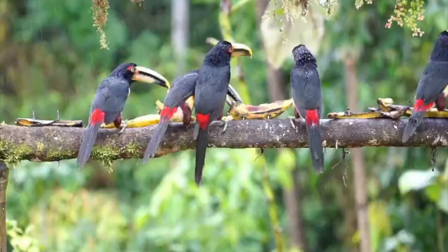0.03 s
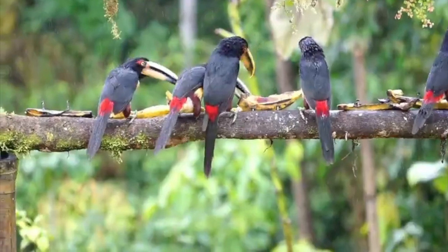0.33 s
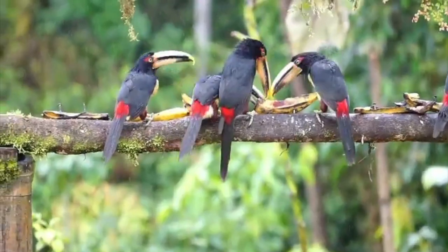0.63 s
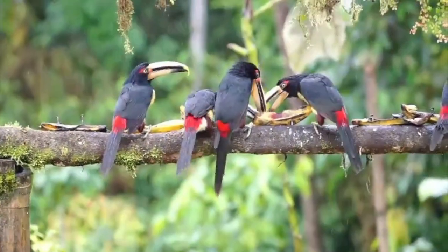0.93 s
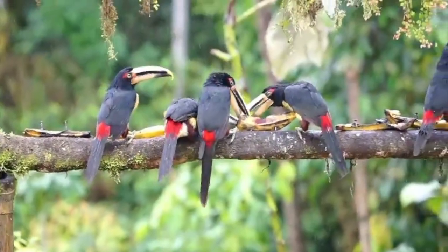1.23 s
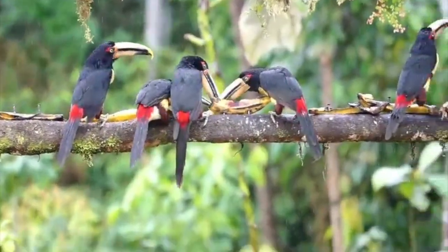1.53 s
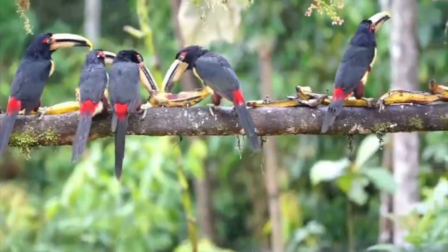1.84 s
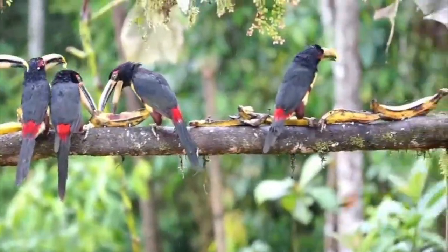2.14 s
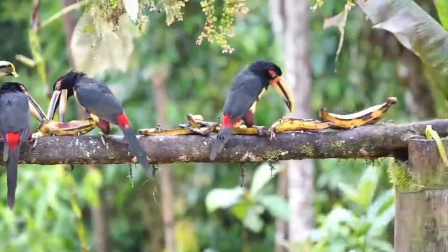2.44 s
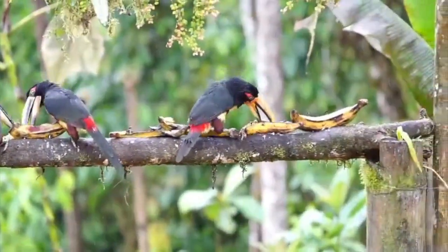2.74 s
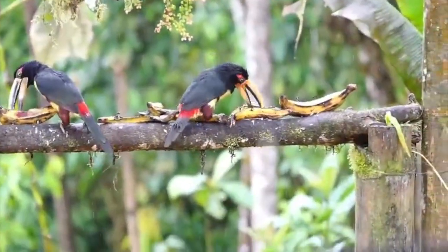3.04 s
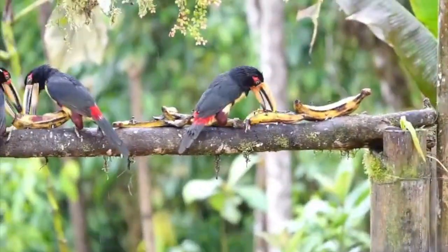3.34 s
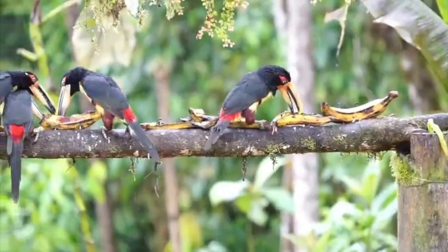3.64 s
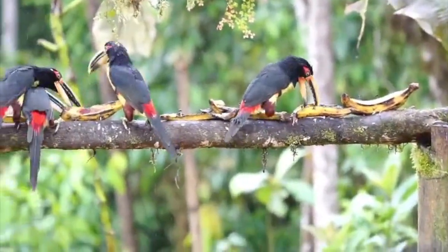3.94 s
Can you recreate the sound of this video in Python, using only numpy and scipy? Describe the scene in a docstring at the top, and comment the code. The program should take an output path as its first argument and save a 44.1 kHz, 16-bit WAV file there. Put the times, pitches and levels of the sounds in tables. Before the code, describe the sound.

Steady light rain and running water fill a forest garden, with soft hollow hoots early and more plops later. Birds on a perch near the microphone flutter once, tick and rustle, and faint high chirps echo slightly.

```python
"""Light rain in a forest garden.

Two microphones stand beside a feeding perch. Drops patter on leaves and ground over a wash of running
water, and something hollow, perhaps a drain, gurgles, hoots and plops. Close by, birds on the perch rustle,
tick and briefly beat their wings; falling chips and thin high notes echo among the trees."""
import sys
import numpy as np
from scipy import signal
from scipy.fft import rfft, irfft
from scipy.io import wavfile
from scipy.ndimage import uniform_filter1d

SR = 44100
rng = np.random.default_rng(int(sys.argv[2]) if len(sys.argv) > 2 else 0)


def put_to_file(sound):
    """Save the sound as 16-bit audio at rate SR, in the file named by the first command-line argument."""
    columns = np.atleast_2d(sound).T  # one column per channel
    safe = np.clip(columns, -1, 1)
    whole_steps = np.round(safe * 32767)
    wavfile.write(sys.argv[1], SR, whole_steps.astype(np.int16))


N = 176400
T = np.arange(N) / SR

# wash of running water: f/Hz, relative level/dB
WASH_SPECTRUM = [(30, -68), (62, -48), (120, -26), (290, -10.5), (450, -8), (850, -6.5), (1300, -8),
                 (2300, -6.5), (3400, -12.5), (5200, -21), (7800, -16), (10000, -24), (12000, -18.5),
                 (15600, -28)]
# fine spray on leaves: f/Hz, relative level/dB
SPRAY_SPECTRUM = [(2500, -23), (4500, 1), (7000, 0.5), (9500, -5.5), (15000, -11.5)]
# rise and fall of wash, spray and sizzle: t/s, relative level/dB
WASH_CURVE = [(.2, -46.5), (.5, -43.5), (1.1, -44.5), (1.45, -42.5), (1.7, -44.5), (2.25, -46),
              (2.5, -43.5), (2.73, -45.5), (3, -44.5), (4, -43.5)]
SPRAY_CURVE = [(1.2, -69), (1.55, -48.5), (2.2, -49.5), (2.9, -47), (3.2, -45.5), (4, -47)]
SIZZLE_CURVE = [(.5, -48), (1.45, -50), (1.8, -54.5)]

# hollow resonances of the drain: f/Hz, width/Hz, relative level/dB
DRAIN_RESONANCES = [(563, 11, 6.5), (652, 52, 2.5)]
# its gurgle: t/s, level/dB
GURGLE_CURVE = [(.3, -56.5), (1.4, -53), (1.8, -53), (2.3, -61), (2.55, -51), (4, -53.5)]
# one resonance singing out: t/s, length/s, level/dB, f/Hz
DRAIN_HOOTS = [(.18, .12, -48, 545), (.305, .078, -47.5, 652), (.486, .12, -50, 550),
               (.715, .09, -44.5, 642), (.96, .2, -43.3, 646), (1.15, .06, -46.5, 705),
               (1.21, .14, -47.5, 535), (1.298, .12, -46, 650), (1.395, .085, -42, 540),
               (1.745, .1, -48, 640), (2.95, .06, -46, 545)]
# hollow plops: t/s, level/dB, f/Hz
DRAIN_PLOPS = [(.722, -30, 643), (1.542, -33, 630), (2.354, -38, 640), (2.464, -36.5, 746),
               (2.529, -36, 646), (2.827, -35, 734), (2.86, -34, 665), (2.924, -35, 678), (2.964, -33, 618),
               (3.019, -34, 670), (3.233, -34.5, 861), (3.361, -35.5, 653), (3.444, -32, 733)]

# sharp ticks on the perch: t/s, peak level/dB, centre f/Hz
PERCH_TICKS = [(.716, -27, 13000), (.79, -29, 11800), (.801, -27, 12000), (.957, -30, 12300),
               (1.619, -27.5, 5000), (1.964, -26.5, 10000), (2.364, -27.5, 8900), (3.006, -23.5, 6500),
               (3.342, -28.5, 7460), (3.402, -26, 13000), (3.514, -23, 8900), (3.554, -24.5, 12500)]
# feathers and leaves: t/s, length/s, level/dB, centre f/Hz
PERCH_RUSTLES = [(0.664, 0.1, -47.5, 13000), (0.872, 0.037, -41.5, 9200), (1.466, 0.11, -42, 7600),
                 (1.517, 0.065, -43.5, 1170), (1.61, 0.043, -43, 11100), (1.936, 0.14, -47, 9800),
                 (2.839, 0.059, -40, 1330), (2.947, 0.19, -44, 10900), (2.978, .1, -39, 1790),
                 (3.319, 0.22, -49.5, 12000), (3.429, 0.06, -38.5, 6400), (3.525, .07, -47, 13000),
                 (3.93, 0.15, -41, 2000)]
# wingbeats close by: t/s, length/s, level/dB
WING_STROKES = [(1.36, .17, -51.5), (1.395, .035, -45), (1.44, .024, -40)]
# the air they stir: f/Hz, relative level/dB
WING_SPECTRUM = [(40, -32), (100, -5), (300, 1), (540, 4), (1000, -14), (5000, -38)]

# falling chips: t/s, length/s, level/dB, starting f/Hz
BIRD_CHIPS = [(2.262, .031, -35.5, 10000), (2.652, .036, -34.5, 10000), (2.777, .018, -36, 9200),
              (3.778, .014, -26.5, 8900)]
# thin buzzy notes: t/s, length/s, level/dB, starting f/Hz, final f/Hz
BIRD_NOTES = [(1.355, .045, -43, 8200, 8150), (2.53, .165, -36, 6900, 8000), (3.14, .13, -43, 7050, 6950)]
# very high lisps: t/s, level/dB
BIRD_LISPS = [(.17, -47.5), (.7, -47), (1.08, -46.5), (2.93, -44.5), (3.54, -48.5)]
# background hum: t/s, length/s, level/dB, f/Hz
LOW_HUM = (3.7, .23, -64, 86)

# likeness of the two microphones: f/Hz, coherence (0 to 1)
MIC_COHERENCE = [(160, 1), (650, 0.84), (1220, 0.52), (2000, 0.27), (15000, 0.16)]
# lead of the left microphone: f/Hz, phase/rad
MIC_LEAD = [(300, 0), (1100, -.35), (2300, -.1), (2900, -.9), (4400, -2.1), (7100, -2.6), (10000, -2.6),
            (11400, -.3), (15000, -1.1)]
# opening fade: t/s, gain
FADER = [(.108, 0), (.18, .8), (.27, 1)]


def water():
    """Running water all around: a broad wash, with leaf spray and a fading sizzle slightly to the left."""
    wash = restless(noise(N, lambda f: amp(at_hz(WASH_SPECTRUM, f))), patch_db=1.75, flicker_db=0.43)
    spray = restless(noise(N, lambda f: amp(at_hz(SPRAY_SPECTRUM, f))), patch_db=2.2, flicker_db=2.3)
    sizzle = restless(noise(N, lambda f: octave_band(f, 3420, 0.29)), patch_db=3.5, flicker_db=3.0)
    treble = spray * level(SPRAY_CURVE) + sizzle * level(SIZZLE_CURVE)
    return amp([[3.1], [3.9]]) * wash * level(WASH_CURVE) + amp([[1.6], [-1.6]]) * treble


def drain(hoot_roughness=.65, plop_t60_s=.076, plop_rise_s=.0014):
    """Running water stirs hollow resonances; now and then one sings out, or a single plop rings."""
    def cavity(f):
        return sum(amp(db) / (1 + (2 * (f - hz) / width) ** 2) for hz, width, db in DRAIN_RESONANCES)

    out = noise(N, cavity) * level(GURGLE_CURVE)
    for s, length, db, hz in DRAIN_HOOTS:
        t, swell = arch(length, skew=0.49)
        tone = (1 + hoot_roughness * buzz(t, width_hz=55)) * glide(t, hz, hz)
        add(out, s, amp(db) * swell * unit(tone.real))
    t = np.arange(SR // 5) / SR
    attack = 1 - np.exp(-t / plop_rise_s)
    for s, db, hz in DRAIN_PLOPS:
        add(out, s, amp(db - 60 * t / plop_t60_s) * attack * np.sin(2 * np.pi * hz * t))
    return out


def rain():
    """Fine drops on leaves and duller splats on the ground, with a short echo."""
    fine = amp(-53) * patter(per_s=1400, spread_db=3.3, low_hz=4500, high_hz=14000, cycles=2.0)
    splats = amp(-50.5) * patter(per_s=450, spread_db=3.0, low_hz=625, high_hz=2766, cycles=2.7)
    return fine + splats + amp(-4.5) * echo(fine + splats, t60_s=0.11)


def patter(per_s, spread_db, low_hz, high_hz, cycles, pitches=30):
    """Drops of random size ring for a few cycles; each pitch reaches the microphones from its own side."""
    out = np.zeros((2, N))
    t = np.arange(1024) / SR
    for hz in np.geomspace(low_hz, high_hz, pitches):
        sizes = amp(spread_db * np.minimum(rng.exponential(1, N), 4))
        impacts = sizes * (rng.random(N) < per_s / pitches / SR)
        lead = rng.uniform(-1.61, 1) * min(hz / 1200, np.pi)
        envelope = np.sqrt(hz) * np.exp(-t * hz / cycles) * (1 - np.exp(-2 * t * hz))
        drop = envelope * np.sin(2 * np.pi * hz * t + np.array([[lead], [-lead]]) / 2)
        out += signal.oaconvolve(impacts[None], drop, axes=1)[:, :N]
    return unit(out)


def perch(tick_decay_s=.0022, grain_db=4.5):
    """Birds close by: ticks, grainy rustles, and wingbeats whose gust hits each microphone differently."""
    def wing_colour(f):
        return amp(at_hz(WING_SPECTRUM, f))

    out = np.zeros((2, N))
    t = np.arange(512) / SR
    for s, db, hz in PERCH_TICKS:
        tick = noise(len(t), lambda f: octave_band(f, hz, octaves=.26)) * np.exp(-t / tick_decay_s)
        add(out, s, amp(db) * tick / abs(tick).max())
    for s, length, db, hz in PERCH_RUSTLES:
        t, swell = arch(length, skew=0.72)
        jitter = unit(uniform_filter1d(rng.standard_normal(len(t)), size=70))
        hiss = noise(len(t), lambda f: octave_band(f, hz, octaves=.71))
        add(out, s, amp(db) * swell * unit(amp(grain_db * jitter)) * hiss)
    for s, length, db in WING_STROKES:
        t, swell = arch(length, skew=0.57)
        turbulence = rfft(rng.standard_normal((2, len(t))))
        gust = irfft(turbulence * wing_colour(np.fft.rfftfreq(len(t), 1 / SR)), len(t))
        add(out, s, amp(db) * swell * unit(noise(len(t), wing_colour) + unit(gust)))
    return out


def bird_calls(lisp_hz=11750, lisp_width_hz=650, partner_below_hz=1900):
    """Falling chips, buzzy notes and high lisps with a weaker, lower partner, echoed by the trees."""
    out = np.zeros((2, N))
    for s, length, db, hz in BIRD_CHIPS:
        t, swell = arch(length, skew=1.1)
        add(out, s, amp(db) * swell * glide(t, hz, hz * .68, bend=1.7).real)
    for s, length, db, from_hz, to_hz in BIRD_NOTES:
        t, swell = arch(length, skew=1.2)
        note = buzz(t, width_hz=430) * glide(t, from_hz, to_hz)
        add(out, s, amp(db) * np.sqrt(swell) * note.real)
    for s, db in BIRD_LISPS:
        t, swell = arch(length_s=.145, skew=0.87)
        partner = amp(-8.5) * buzz(t, lisp_width_hz) * np.exp(-2j * np.pi * partner_below_hz * t)
        lisp = (buzz(t, lisp_width_hz) + partner) * glide(t, lisp_hz, lisp_hz)
        add(out, s, amp(db) * swell * lisp.real)
    return out + amp(-7.5) * echo(out, t60_s=.32)


def hum():
    """One faint low tone swells and fades in the background."""
    out = np.zeros((2, N))
    s, length, db, hz = LOW_HUM
    t, swell = arch(length, skew=1)
    add(out, s, amp(db) * swell * glide(t, hz, hz).real)
    return out


def echo(x, t60_s):
    """Trunks and leaves scatter a diffuse tail back to the microphones."""
    t = np.arange(SR // 2) / SR
    tail = noise(len(t), np.ones_like) * amp(-60 * t / t60_s)
    return signal.fftconvolve(x, tail / np.linalg.norm(tail[0]), axes=1)[:, :N]


def noise(n, shape):
    """Noise with gain shape(Hz) at the two microphones: alike in the bass, less so in the treble."""
    hz = np.fft.rfftfreq(n, 1 / SR)
    left, unrelated = rfft(rng.standard_normal((2, n)))
    coherence = np.clip(at_hz(MIC_COHERENCE, hz), 0, 1)
    right = (coherence * left + np.sqrt(1 - coherence ** 2) * unrelated) * np.exp(-1j * at_hz(MIC_LEAD, hz))
    return unit(irfft(np.array([left, right]) * shape(hz), n))


def restless(x, patch_db, flicker_db):
    """The level wavers in random patches of time and pitch, and flickers quickly across wide bands."""
    spectra = signal.stft(x, nperseg=512, noverlap=384)[2]
    a, b = rng.standard_normal((2,) + spectra.shape[1:])
    patches = unit(uniform_filter1d(uniform_filter1d(a, size=9, axis=0), size=18, axis=1))
    flicker = unit(uniform_filter1d(uniform_filter1d(b, size=140, axis=0), size=6, axis=1))
    spectra *= amp(patch_db * patches + flicker_db * flicker)
    return unit(signal.istft(spectra, nperseg=512, noverlap=384)[1][:, :N])


def glide(t, from_hz, to_hz, bend=1):
    """A sliding complex tone at the two microphones; bend over 1 slides ever faster."""
    hz = from_hz + (to_hz - from_hz) * np.linspace(0, 1, len(t)) ** bend
    lag = np.array([[0], [1]]) * at_hz(MIC_LEAD, hz)
    return np.exp(1j * (2 * np.pi * np.cumsum(hz) / SR - lag))


def buzz(t, width_hz):
    """Quick random flutter that widens a tone."""
    spread = np.exp(-2 * (np.fft.fftfreq(len(t), 1 / SR) / width_hz) ** 2)
    return unit(np.fft.ifft(spread * np.exp(2j * np.pi * rng.random(len(t)))))


def arch(length_s, skew):
    """Time axis and a swell that rises and falls; skew under 1 peaks early."""
    t = np.arange(0, length_s, 1 / SR)
    return t, abs(np.sin(np.pi * (t / length_s) ** skew))


def octave_band(hz, centre_hz, octaves):
    """Gain of a soft-edged band."""
    return np.exp(-.5 * (np.log2((hz + 1) / centre_hz) / octaves) ** 2)


def at_hz(points, hz):
    """Reads a table on a log-frequency axis."""
    f, value = np.transpose(points)
    return np.interp(np.log(hz + 1), np.log(f + 1), value)


def level(points):
    """A dB curve as a gain for every sample."""
    return amp(np.interp(T, *np.transpose(points)))


def amp(db):
    """Decibels to gain."""
    return 10 ** (np.asarray(db) / 20)


def unit(x):
    """Scales to rms 1."""
    return x / np.sqrt(np.mean(abs(x) ** 2) + 1e-20)


def add(mix, s, sound):
    """Mixes a sound in at time s."""
    part = mix[:, max(round(s * SR), 0):][:, :sound.shape[-1]]
    part += sound[..., :part.shape[1]]


def scene():
    """The garden from beside the perch, whose sounds come back from the trees."""
    near = perch()
    return water() + drain() + rain() + near + amp(-6) * echo(near, t60_s=0.43) + bird_calls() + hum()


def record(dry, cutoff_hz=15800):
    """Both microphones are faded in and lose their highest treble."""
    faded = dry * np.interp(T, *np.transpose(FADER))
    lowpass = signal.firwin(511, cutoff_hz, window=("kaiser", 9), fs=SR)
    return signal.oaconvolve(faded, lowpass[None], "same")


dry = scene()
out = record(dry)
put_to_file(out)
```